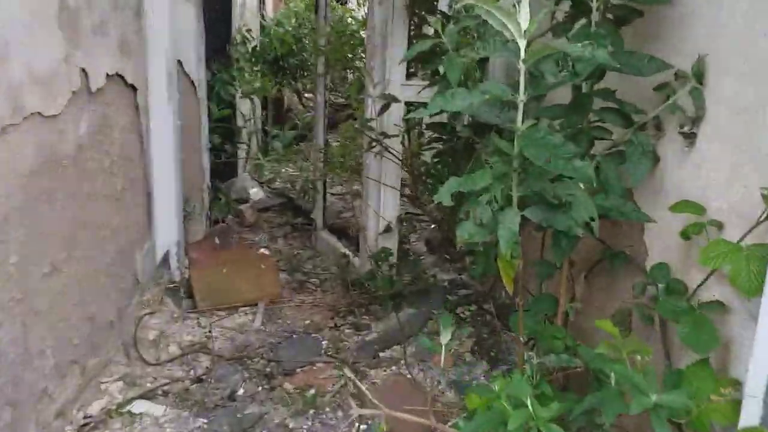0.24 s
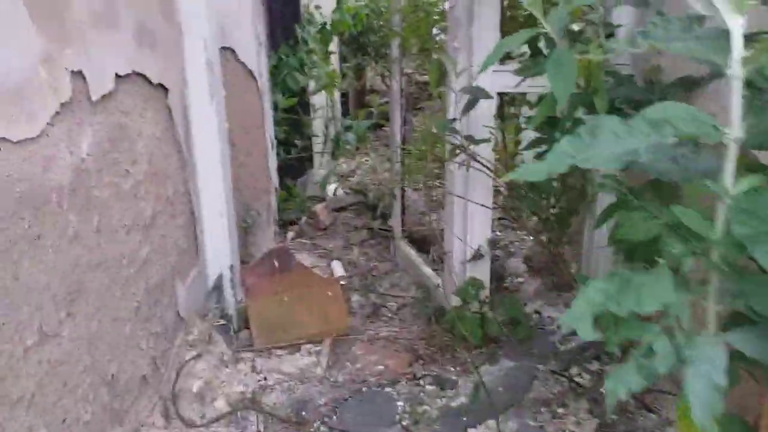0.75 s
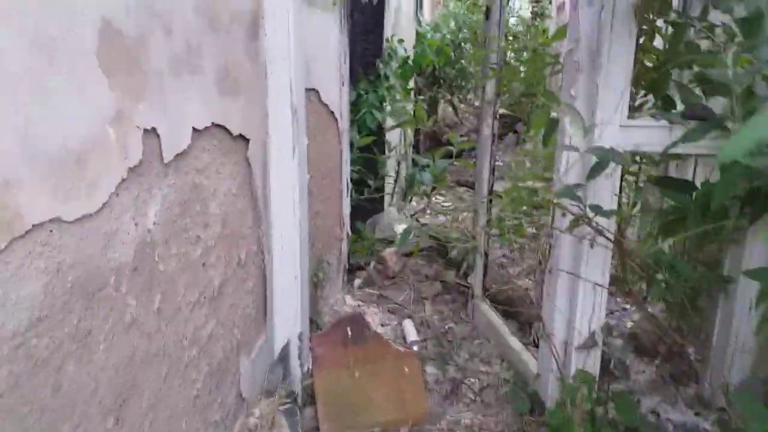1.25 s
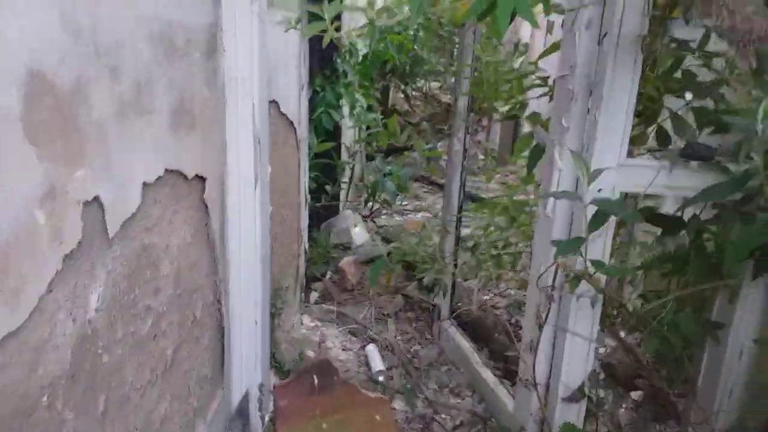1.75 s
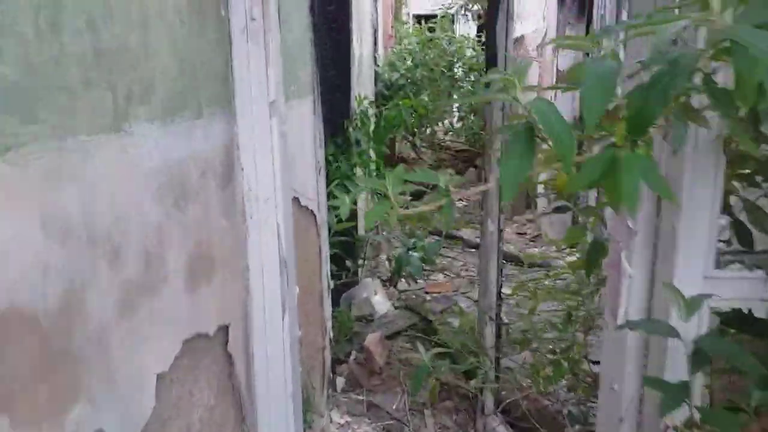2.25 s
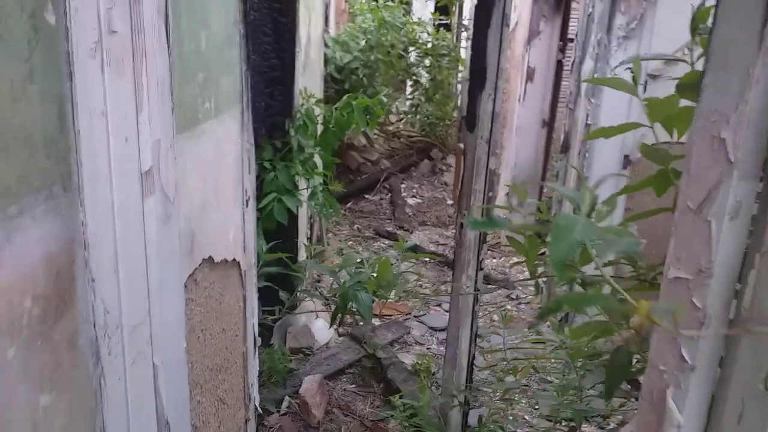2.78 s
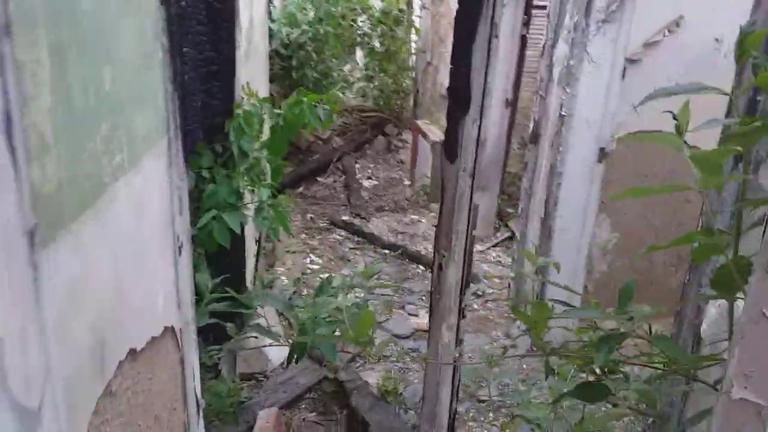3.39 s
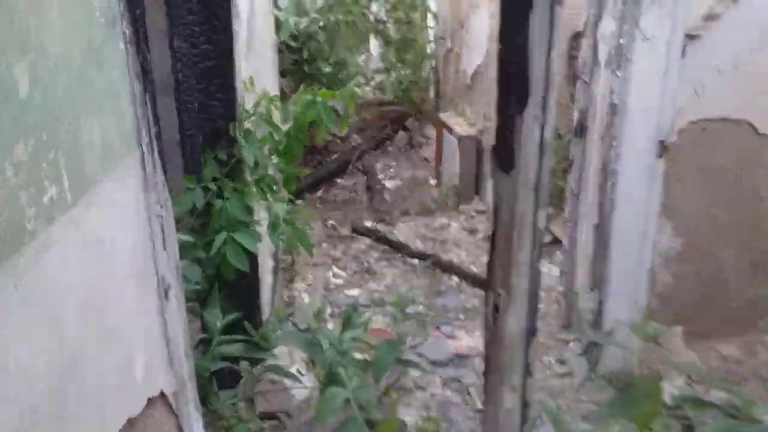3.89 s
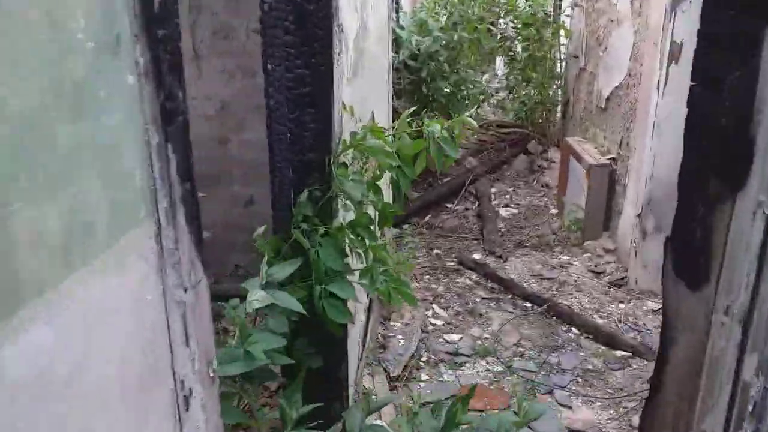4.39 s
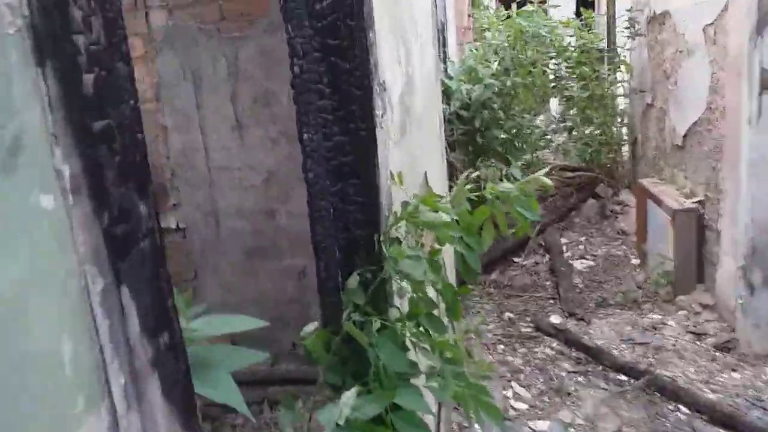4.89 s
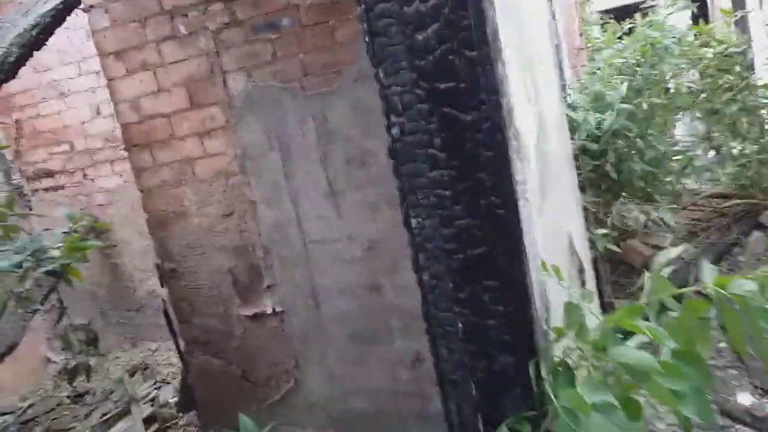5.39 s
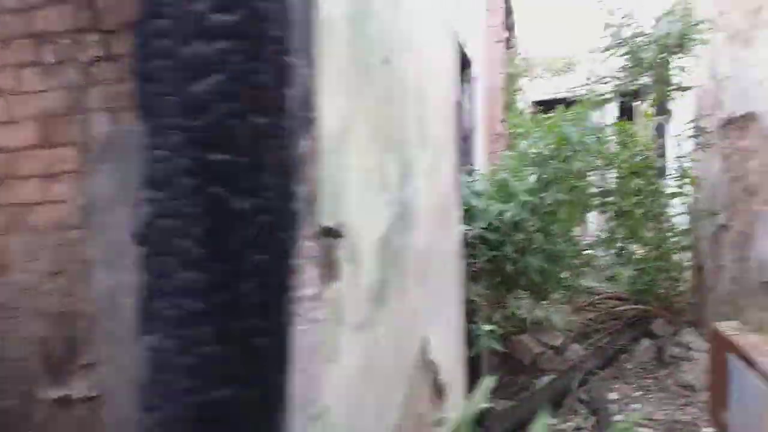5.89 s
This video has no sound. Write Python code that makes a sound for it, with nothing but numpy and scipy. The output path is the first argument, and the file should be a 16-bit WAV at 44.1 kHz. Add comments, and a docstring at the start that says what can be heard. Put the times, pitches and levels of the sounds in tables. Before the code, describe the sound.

Slow steps over brittle debris, heard close from a handheld microphone. A cluster of dry snaps opens, then pauses and fresh crunches follow, the busiest around one to two and a half seconds. Kicked tiles clink, small shards ring briefly, and lumps shift underneath. Later cracks are sparser, ending on a sharp knock. Low rumble, faint road noise and leaf hiss stay quiet behind, with slight echoes from bare walls.

```python
"""In a roofless ruin, slow steps cross rubble: plaster, slate and twigs snap and grit crunches under the soles.
Breaks are bursts of dying noise, grit is thousands of tiny clicks, and loose tiles and metal are fading tones.
Leaves crackle, and bare walls answer with a short noise tail. Outside, filtered noise makes a faint road,
a low rumble and hissing foliage; soft thumps are short swells of a low tone."""
import sys
import numpy as np
from scipy import signal
from scipy.fft import rfft, irfft, next_fast_len
from scipy.io import wavfile
from scipy.ndimage import uniform_filter1d, minimum_filter1d, map_coordinates

SR = 44100
rng = np.random.default_rng(int(sys.argv[2]) if len(sys.argv) > 2 else 0)


def unload_wav(signal):
    """Save mono or channel-first audio to the path in sys.argv[1] as 16-bit WAV at rate SR, clipped to [-1, 1]."""
    wavfile.write(
        sys.argv[1],
        SR,
        np.round(np.clip(np.atleast_2d(signal).T, -1, 1) * 32767).astype(np.int16),
    )


N = 270906  # length in samples

# the tones that three larger pieces ring with: pitch_hz, level_db (relative to the kick), t60_s
SLAB = [(526, -11.5, 0.09), (852, -18, 0.27), (1278, -0.5, 0.029), (2530, -3, .031), (3690, -3.5, 0.086),
        (4370, -10.5, 0.1), (5740, 2.5, 0.047)]
TILE = [(792, -30, 0.18), (2660, -14, 0.078), (3604, 1.5, 0.025)]
BOARD = [(980, -4, 0.028), (1280, -3, 0.03), (1524, 2, 0.031), (2020, -1.5, .066)]


def amp(db):
    """Turn decibels into a gain."""
    return 10 ** (np.asarray(db) / 20)


def unit(x):
    """Scale a sound to an average strength (rms) of 1."""
    return x / np.sqrt(np.mean(x ** 2) + 1e-20)


def along(points, hz):
    """Read a curve of (Hz, value) points on a logarithmic pitch axis."""
    point_hz, value = np.transpose(points)
    return np.interp(np.log(hz + 1), np.log(point_hz + 1), value)


def curves(rows):
    """Join timed rows with straight lines: one value per sample for each column after the time."""
    s, *columns = np.transpose(rows)
    return [np.interp(np.arange(N) / SR, s, column) for column in columns]


def wobble(rate, size):
    """A smooth random curve through a given rate of random points a second."""
    points = rng.standard_normal(int(size * rate / SR) + 4)
    return map_coordinates(points, [np.arange(size) * rate / SR])


def fade(t, t60):
    """Die away by 60 dB in t60 seconds (at least a millisecond)."""
    return np.exp(-np.log(1000) * t / max(t60, 1e-3))


def add(track, s, sound):
    """Mix a sound into a track at time s."""
    start = max(round(s * SR), 0)
    part = sound[:max(len(track) - start, 0)]
    track[start:start + len(part)] += part


def colour(x, points):
    """Filter through (Hz, dB) points, reacting as early as possible and never ahead of the sound."""
    m = 2 * next_fast_len(len(x) // 2 + 1024)
    gain = amp(along(points, np.fft.rfftfreq(m, 1 / SR)))
    # folding the cepstrum forward in time makes the filter minimum-phase
    cepstrum = irfft(np.log(gain), m)
    cepstrum[1:m // 2] *= 2
    cepstrum[m // 2 + 1:] = 0
    return irfft(rfft(x, m) * np.exp(rfft(cepstrum)), m)[:len(x)]


def coloured_noise(points):
    """Steady noise shaped by (Hz, dB) points, with rms 1."""
    return unit(colour(rng.standard_normal(N), points))


def resonate(x, hz, q):
    """The part of a sound that one resonance picks out."""
    return signal.lfilter(*signal.iirpeak(hz, q, fs=SR), x)


def burst(t, t60):
    """Dying noise with a total energy of 1."""
    x = rng.standard_normal(len(t)) * fade(t, t60)
    return x / np.linalg.norm(x)


def footwork():
    """Levels of grit, lumps and leaves in dB: every press of a sole loads, holds and releases."""
    # presses or drags on the rubble; lumps and leaves are relative to the grit:
    # start_s, hold_s, grit_db, lumps_db, leaves_db
    presses = [(0, 0.023, -43.5, -6, -2.5), (.17, 0.021, -48, -6, -8), (0.364, 0.088, -40, -9, -10),
               (0.508, 0.089, -42.5, -9, -5), (0.626, 0.1, -44.5, -23, -12.5),
               (0.955, 0.21, -47, -3.5, 1.5), (1.267, 0.034, -34, -18, -4), (1.406, 0.047, -41, -9, -6),
               (1.531, 0.092, -34, -11, -6.5), (1.667, 0.054, -39.5, -7.5, -8), (1.816, 0.033, -57, -3, 0),
               (2.077, .02, -44.5, -7, 1.5), (2.291, 0.033, -34, -7, -12), (2.463, 0.084, -29.5, -13, -9),
               (2.611, 0.015, -39, -10.5, -15), (2.887, 0.037, -52.5, 4, -2),
               (2.996, 0.0223, -45.5, -14, -21), (3.19, .04, -50, 3.5, -14), (3.367, 0.082, -43, -4, -14),
               (3.777, 0.051, -34, -17, -5), (3.868, 0.16, -38.5, -6.5, -5.5), (4.028, 0.062, -36, -10, 0),
               (4.188, 0.04, -42.5, -2, -4.5), (4.48, 0.012, -45, -13, -11), (4.57, 0.11, -53, -25, -2.5),
               (4.987, 0.055, -41, -11, -14), (5.252, 0.19, -47.5, -7, -5), (5.433, .04, -40, -11.5, -8),
               (5.517, 0.14, -45, -4, -10), (5.765, 0.056, -46, -1, -7.5), (5.858, 0.14, -40.5, -5.5, -6),
               (6.05, 0.11, -48, -1.5, -8)]
    # levels between steps: grit_db, lumps_db, leaves_db
    settling_db = (-55, -58, -65)
    load_db_per_s, release_db_per_s = 457, 221.5  # weight comes on, then the rubble settles
    t = np.arange(N) / SR
    power = np.outer(amp(settling_db) ** 2, np.ones(N))
    for s, hold, db, lumps_db, leaves_db in presses:
        before, after = np.maximum(s - t, 0), np.maximum(t - s - hold, 0)
        shape_db = -load_db_per_s * before - release_db_per_s * after
        power += np.outer(amp([db, db + lumps_db, db + leaves_db]) ** 2, amp(shape_db) ** 2)
    return 10 * np.log10(power)


def grains(rate, spread_db, life, count=6):
    """Tiny fractures at random moments: mostly small, a few large, from several kinds of fragment."""
    t, out = np.arange(SR // 80) / SR, np.zeros(N)
    for _ in range(count):
        happens = rng.random(N) < rate / count / SR
        size_db = spread_db * np.minimum(rng.standard_exponential(N), 3.5)
        out += signal.oaconvolve(happens * amp(size_db), burst(t, life))[:N]
    return out


def pebbles(rate, pitch_hz, cycles, spread_db):
    """Chips of stone tick against each other, each ringing briefly at a pitch of its own."""
    out, t = np.zeros(N), np.arange(SR // 25) / SR
    chips = rng.standard_normal((5000, 4))
    times = np.cumsum(chips[:, 0] ** 2) / rate  # irregular gaps
    for s, (_, smallness, force, phase) in zip(times[times < N / SR], chips):
        hz = np.clip(pitch_hz * np.exp(0.57 * np.tanh(smallness)), 100, 8000)
        tick = np.sin(2 * np.pi * hz * t + phase) * fade(t, cycles / hz)
        add(out, s, amp(spread_db * min(force, 1.7)) * tick)
    return unit(out)


def crunch(grit_db, weight_db, rustle_db):
    """Grit fractures under the sole, chips tick, bigger lumps shift below, dry leaves and dust crackle on top."""
    # tone of the grit, the heavy lumps and the leaves: pitch_hz, level_db
    grit_tone = [(500, -10), (900, -4), (1800, -2.5), (2800, -3.5), (3900, 5), (5800, 1.5), (6700, -2),
                 (7700, -32.5), (9000, -19), (12000, -48)]
    weight_tone = [(25, -44), (50, -31), (100, -2), (200, 1), (450, -1), (900, -1.5), (1800, -5.5),
                   (3500, -8.5), (8000, -57.5)]
    rustle_tone = [(2000, -50), (5000, 4.5), (7000, -2), (8800, -18.5), (10500, -7), (12500, -1),
                   (15500, 3.5)]
    clumps = amp(2.0 * wobble(70, size=N))  # all the grains thicken and thin together
    fractures = clumps * grains(rate=1400, spread_db=3, life=.007)
    lumps = clumps * grains(rate=500, spread_db=4, life=0.034)
    crackle = clumps * grains(rate=2400, spread_db=2.5, life=0.0067)
    chips = pebbles(rate=380, pitch_hz=4200, cycles=65, spread_db=5)
    grit = amp(grit_db - 0.5) * unit(colour(unit(fractures) + 0.3 * chips, grit_tone))
    weight = amp(weight_db - 1.5) * unit(colour(lumps, weight_tone))
    rustle = amp(rustle_db + 4.0) * unit(colour(crackle, rustle_tone))
    return grit + weight + rustle


def snap(hz, length, body_db, clack_db, edge_db):
    """A piece breaks with a sharp spike, crumbles, then chatters against its neighbours; size sets its resonance."""
    t = np.arange(SR // 6) / SR
    brittle = np.clip(1.15 - length / 0.058, 0, .9)  # quick breaks put their energy into the first spike
    spike = brittle * burst(t, 0.0077)
    crumble = np.sqrt(1 - brittle ** 2) * burst(t, length * 1.6)
    chatter = amp(-5.5) * burst(t, 0.081) * (1 - np.exp(-t / 0.0015))
    notch_db = edge_db - 10.0  # a dip just below the top treble
    tone = [(30, body_db - 46.5), (170, body_db + 2.0), (600, body_db), (1800, clack_db),
            (3300, -0.53), (6200, -1.66), (7700, notch_db + 4.5), (9000, notch_db - 5.5),
            (12000, edge_db - 1), (15500, edge_db)]
    crack = colour(spike + crumble + chatter, tone)
    return amp(-2.0) * (crack + 1.5 * resonate(crack, hz, q=11.9))


def snaps():
    """Plaster, slate and twigs give way under the foot, each as one snap."""
    # the loudest breaks and knocks; body (lows), clack (mids) and edge (top treble) steer the tone around the crack:
    # start_s, level_db (before the snap's own trim), resonance_hz, length_s (sets the decay),
    # body_db, clack_db, edge_db
    breaks = [(.2852, -4.5, 3420, 0.074, -17, -2, -12), (0.3419, 1, 3700, 0.031, -18.5, -6, -3.5),
              (0.366, 5, 5180, 0.066, -12, 0.5, -3.5), (.387, 4, 4200, 0.034, -13, -5, -12),
              (.4263, 1, 3950, 0.094, 2.5, -14, -1), (0.4433, 7, 5400, .044, -5, -6, -2),
              (.451, 7.5, 3250, 0.027, -11, -0.5, -16), (0.4975, 1.5, 2520, 0.023, 1, 0.5, -8),
              (0.5212, -0.5, 6050, .031, -2, -17, -10), (.5317, 2, 6370, 0.036, -4, -15, -15),
              (.833, -15.5, 3830, 0.032, -8.5, 7, 4), (0.9529, 2, 3700, 0.047, -12, -4, -8.5),
              (1.0218, -2, 5400, .022, -30, -8, -3), (1.218, 17.5, 2466, 0.012, -6.5, 3.5, -18),
              (1.2238, 15.5, 5730, .057, -8.5, -13, -14), (1.2745, -3, 4260, 0.1, -5, 14, -16),
              (1.295, 7, 3700, 0.046, -5.5, -5, -12), (1.3667, -3, 4360, .052, -7, -19, -9),
              (1.49, 1, 5500, 0.09, -2, -5, -3), (1.5423, 5.5, 4100, 0.026, -6, -5.5, -6.5),
              (1.5709, -1, 3700, 0.032, -4, 7, -4), (1.5907, 3, 4370, .078, -25, 0, -11),
              (1.617, 7, 5600, 0.045, -16, -5, -6), (1.6888, 5, 5600, 0.097, -14, -13, -8),
              (1.7376, 0.5, 5000, 0.04, -25, -19, -11), (1.83, -23, 6000, .02, -10, -10, 5),
              (1.918, -7, 5670, 0.036, -8, -25, -20), (2.06, -8.5, 4570, 0.05, -14, -16, 0.5),
              (2.118, -16, 2530, .03, 7, 12, -12), (2.1809, -4, 3840, 0.0394, 5, 9, -16),
              (2.259, -5, 5000, 0.066, -8, -12, -5), (2.268, 6.5, 5840, .078, -9, -7, -9.5),
              (2.279, 4.5, 3450, .041, -1, -6, -20), (2.3339, 17, 4070, 0.0226, -23, -13.5, -20.5),
              (2.363, 9.5, 2400, 0.11, -14, -11, -16.5), (2.417, 6.5, 2410, 0.03, -11, 4, -24),
              (2.4194, 17, 3800, 0.054, -27, -7.5, -34), (2.545, 4, 4100, 0.056, 2, -1, -26),
              (2.566, 6.5, 5400, 0.06, -24, -8, -14), (2.868, -18, 3530, 0.043, 14, -2, -9),
              (2.9783, -3.5, 5730, 0.062, 1, -3, -15), (3.0123, 0, 3830, 0.043, -11, -18, -23),
              (3.1207, -7, 3880, 0.027, -3, -28, -18.5), (3.1572, 8.5, 3660, 0.034, -23, -6, -17),
              (3.161, 10, 4250, 0.031, -7, -10.5, -15.5), (3.3027, -5, 3100, 0.044, -6, 2, -30),
              (3.3848, -2, 3600, 0.089, -7, 2, -23), (3.431, -4.5, 4170, .042, -10, -5, -15),
              (3.466, -6, 4230, 0.05, 0, 3.5, -6), (3.5946, -8.5, 2900, 0.12, -14, 2, -30),
              (3.6637, -2.5, 4840, 0.19, -2.5, -0.5, -6.5), (3.71, 2, 3610, 0.16, -6, -5.5, -5.5),
              (3.7515, 4, 5500, 0.036, -14, -12, -7), (3.9056, -4, 5170, .066, -16, -10, 3),
              (3.978, 4.5, 5800, 0.12, -6, -2.5, -12), (4.0472, 13.5, 5650, .035, -31, -20, -4),
              (4.129, -10.5, 5660, 0.045, -28, -20, 13), (4.1351, 13.5, 6000, 0.053, -11, -15.5, -10.5),
              (4.1731, 12, 3400, 0.019, -8.5, -5, -15), (4.41, -21.5, 5000, 0.046, -8, -8, 3),
              (4.7706, -0.5, 3640, 0.011, -11, -15, -9.5), (4.7794, 3, 5200, 0.022, 1.5, -6.5, -16),
              (4.945, -6, 5880, 0.055, -7, -6, -8), (4.9654, 0.5, 3540, 0.051, -2, -36, -13),
              (5.0853, -2, 3670, 0.14, -6, -3, -15), (5.81, -3.5, 2890, 0.067, 8.5, 8.5, -18.5),
              (5.8155, 7.5, 2740, 0.073, -9, -19, -16.5), (5.86, 6, 2725, 0.042, -3, -5.5, -21),
              (5.868, 9.5, 2770, 0.026, -5, -20, -12), (5.929, 10.5, 3350, 0.0294, -24, -12, -19),
              (5.9338, 18.5, 2800, 0.017, -13.5, 6.5, -14.5)]
    out = np.zeros(N)
    for s, db, *piece in breaks:
        add(out, s, amp(db) * snap(*piece))
    return out


def splinters(grit_db):
    """Small pieces snap at random moments, louder the harder the sole presses."""
    density, above_grit_db, spread_db = 34, 29.5, 3  # density: higher packs the snaps closer
    out = np.zeros(N)
    draws = rng.standard_normal((400, 4))
    times = np.cumsum(np.abs(draws[:, 0])) / density
    for s, (_, force, smallness, sharpness) in zip(times[times < N / SR], draws):
        db = grit_db[int(s * SR)] + above_grit_db + spread_db * np.tanh(force)
        hz = 4200 * np.exp(0.27 * np.tanh(smallness))
        edge_db = -11 + 2.46 * sharpness
        add(out, s, amp(db) * snap(hz, length=0.059, body_db=-11.5, clack_db=-8, edge_db=edge_db))
    return out


def ring(hz, t60):
    """One tone of a ringing piece, unsteady as it rocks on the rubble."""
    t = np.arange(SR // 3) / SR
    phase = 2 * np.pi * hz * t + 0.5 * wobble(400, size=len(t))
    return np.sin(phase) * fade(t, t60) * (1 - np.exp(-t / 0.00046))


def clinks():
    """Kicked pieces ring with all their tones, small shards with one."""
    # kicked larger pieces: start_s, level_db (before the final trim), piece
    kicks = [(1.218, -11, SLAB), (2.4198, 0.5, TILE), (5.934, -15.5, BOARD)]
    # small shards with one clear note: start_s, pitch_hz, level_db (before the final trim), t60_s
    shards = [(.496, 2576, -27, .037), (.521, 6260, -18, 0.0174), (1.2745, 900, -16.5, 0.05),
              (2.311, 1300, -19.5, .026), (2.324, 3970, -20, .078), (2.331, 463, -26.5, 0.08),
              (2.368, 2450, -26, 0.14), (2.545, 986, -29, 0.044), (3.303, 3220, -22, 0.019),
              (3.319, 2670, -29, 0.017), (3.403, 436, -34, 0.067), (3.483, 3040, -31, .053),
              (3.785, 2660, -26.5, 0.094), (3.796, 1450, -28, 0.0294), (4.1733, 3900, -38, 0.43),
              (4.966, 3720, -30, 0.053), (5.03, 3795, -32, .11), (5.818, 2577, -22, .08),
              (5.824, 2880, -23, .05), (5.862, 2720, -17.5, 0.052), (5.869, 5640, -24, .14)]
    out = np.zeros(N)
    for s, db, piece in kicks:
        for hz, mode_db, t60 in piece:
            add(out, s, amp(db + mode_db) * ring(hz, t60))
    for s, hz, db, t60 in shards:
        add(out, s, amp(db) * ring(hz, t60))
    return amp(-2.0) * out


def jingle():
    """Small metal parts touch; each contact rings their tones at new strengths and slightly new pitches."""
    # moments of contact: start_s, level_db (before the trim)
    contacts = [(0.531, -28), (.548, -47), (.589, -32.5), (.62, -45), (.648, -41)]
    # tones of the metal: pitch_hz, level_db (relative to the contact), t60_s
    metal = [(5310, -1, 0.09), (6620, 3, 0.124), (6840, -3, 0.114), (7700, 0, 0.06), (8100, -4, 0.082),
             (9470, -8, 0.081), (10000, -7.5, 0.12), (11900, -12.5, 0.144), (13200, -7, 0.11),
             (14950, -13, 0.2)]
    out, t = np.zeros(N), np.arange(SR // 3) / SR
    for s, db in contacts:
        for hz, mode_db, t60 in metal:
            new_hz = hz * (1 + rng.normal(0, 0.0025))
            phase = 2 * np.pi * new_hz * t + 1.0 * wobble(250, size=len(t))
            flutter_db = 3.6 * wobble(60, size=len(t))  # the parts keep brushing each other as they ring
            add(out, s, amp(db + mode_db - 6.0 + flutter_db) * np.sin(phase) * fade(t, t60))
    return out


def walls(x):
    """Bare walls open to the sky give a short tail of echoes, with a different fading time at each pitch."""
    # how long the echoes last: pitch_hz, t60_s
    echo_times = [(150, 0.18), (600, 0.24), (1500, 0.27), (4000, 0.25), (12000, 0.15)]
    hz, t, z = signal.stft(rng.standard_normal(SR // 2), SR, nperseg=256)
    decay_db = -60 * t / along(echo_times, hz)[:, None]
    tail = signal.istft(z * amp(decay_db), SR, nperseg=256)[1]
    tail *= 1 - np.exp(-np.arange(len(tail)) / SR / 0.0027)  # the echoes take a moment to build
    return signal.fftconvolve(x, tail / np.linalg.norm(tail))[:N]


def thumps():
    """Heel weight and hand movement arrive as short, dull bumps: a low tone swells and fades."""
    # soft thumps: centre_s, level_db, pitch_hz, length_s (spread of the bell-shaped swell)
    bumps = [(.165, -35.5, 96, 0.021), (.215, -42, 63, 0.032), (.445, -48, 264, 0.014),
             (.545, -34.5, 121, 0.0091), (.57, -43.5, 70, 0.048), (1.245, -46, 89, .025),
             (3.178, -34, 143, 0.0072), (3.21, -49, 105, 0.018), (4.16, -42, 152, 0.019),
             (5.005, -38, 243, 0.0041), (5.65, -31, 88, 0.01), (5.785, -32, 137, 0.011)]
    out, t = np.zeros(N), np.arange(-SR // 8, SR // 8) / SR
    for s, db, hz, length in bumps:
        phase = 2 * np.pi * hz * t + wobble(hz / 2, size=len(t))
        add(out, s + t[0], amp(db) * np.cos(phase) * np.exp(-.5 * (t / length) ** 2))
    return out


def passing_car(t, tyres_db, nearest_s):
    """Tyre noise from a distant road meets its own reflection, which arrives latest when the car is far."""
    # tone of the tyres: pitch_hz, level_db
    tyre_tone = [(100, -31.5), (400, -8.5), (700, -6), (950, 2), (1300, -0.5), (1900, -7.5), (2500, -12.5),
                 (4000, -15), (9000, -64)]
    direct = coloured_noise(tyre_tone)
    # the reflection's comb of peaks glides up, then down as the car passes
    echo_delay_s = 0.003 * np.hypot(1, (t - nearest_s) / 0.9)
    reflection = map_coordinates(direct, [np.arange(N) - echo_delay_s * SR])
    passing = unit(direct + .45 * reflection)
    return amp(tyres_db + 0.1 * wobble(5.1, size=N)) * passing


def low_rumble():
    """Deep noise rises and falls slowly, with a small random unsteadiness."""
    # tone of the rumble: pitch_hz, level_db
    rumble_tone = [(20, -64), (30, -43), (42, -11), (62, 4), (90, 2), (150, -6.5), (400, -17),
                   (1000, -14.5), (4000, -80)]
    # its slow course: time_s, level_db (before the 4 dB lift below)
    rumble_level = [(0.0, -54), (2.92, -66.5), (4.16, -55), (4.46, -65.5), (5.32, -63.5), (5.8, -48),
                    (6.14, -62)]
    rumble_db, = curves(rumble_level)
    return amp(rumble_db + 4 + wobble(6, size=N)) * coloured_noise(rumble_tone)


def soft_hiss(tyres_db):
    """Foliage hisses steadily and the passing car adds hiss of its own; their powers add up."""
    # tone of the hiss: pitch_hz, level_db
    air_tone = [(200, -8), (1000, 2), (2500, -5.5), (4200, 3), (6200, -2.5), (7700, -18), (9000, -41),
                (13000, -9.5), (16000, -28)]
    foliage_db, car_hiss_db = -53.5, -9.5  # the car's hiss is relative to its hum
    strength = np.hypot(amp(foliage_db), amp(tyres_db + car_hiss_db))
    return strength * amp(0.96 * wobble(3.7, size=N)) * coloured_noise(air_tone)


def outdoors():
    """A car passes on a distant road and fades over a low rumble; foliage hisses softly."""
    car_db, nearest_s, recede_s = -43.5, 0.44, 1.13  # loudest level, when, time to recede
    fall_db = 18  # loss per tenfold squared distance
    t = np.arange(N) / SR
    tyres_db = car_db - fall_db * np.log10(1 + ((t - nearest_s) / recede_s) ** 2)
    return low_rumble() + passing_car(t, tyres_db, nearest_s) + soft_hiss(tyres_db)


def scene():
    """The steps in the ruin and their echoes, over the outdoor background."""
    grit_db, weight_db, rustle_db = footwork()
    steps = snaps() + clinks() + jingle() + crunch(grit_db, weight_db, rustle_db) + splinters(grit_db)
    return (steps + amp(-16.5) * walls(steps) + thumps() + outdoors())[None]


def record(dry):
    """The recorder cuts the deepest bass, turns down the tallest peaks and keeps nothing above its band limit."""
    top_hz = 15950
    lean = signal.sosfilt(signal.butter(4, 42, "highpass", fs=SR, output="sos"), dry)
    needed = np.minimum(1, .95 / (np.abs(lean) + 1e-9))  # gain that keeps each sample below 0.95
    held = lean * uniform_filter1d(minimum_filter1d(needed, size=45), size=45)
    m = next_fast_len(N + SR // 2)
    return irfft(rfft(held, m) * (np.fft.rfftfreq(m, 1 / SR) < top_hz), m)[..., :N]


dry = scene()
out = record(dry)
unload_wav(out)
```